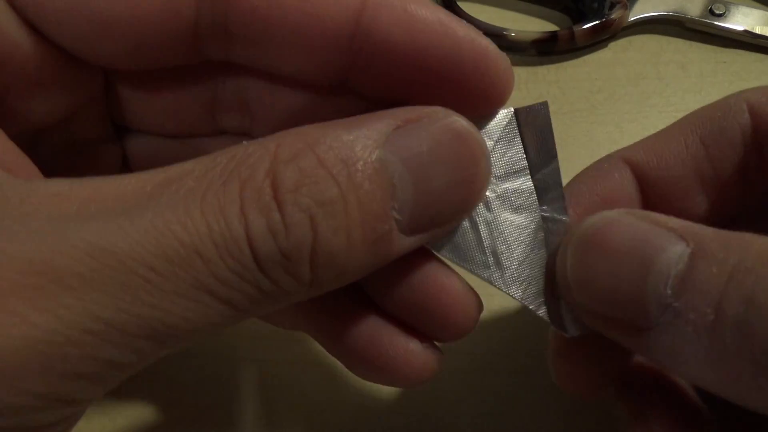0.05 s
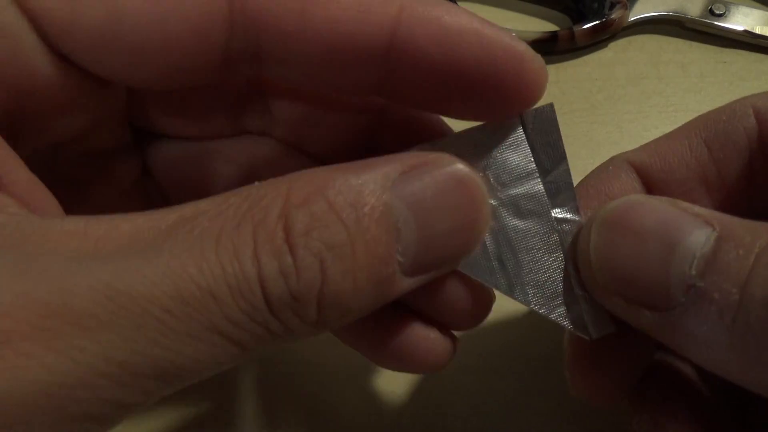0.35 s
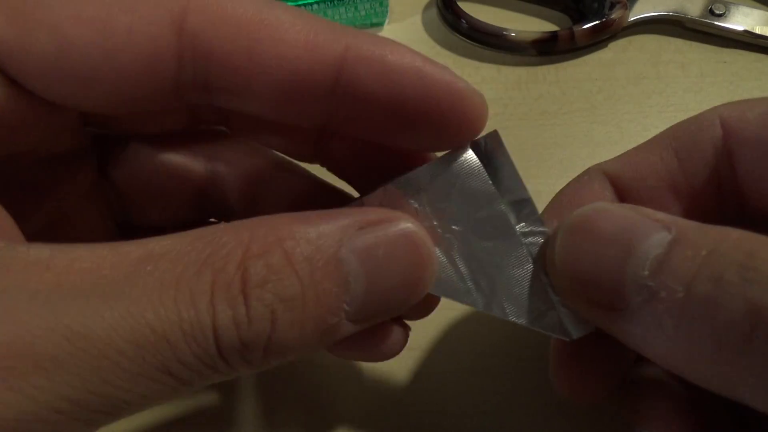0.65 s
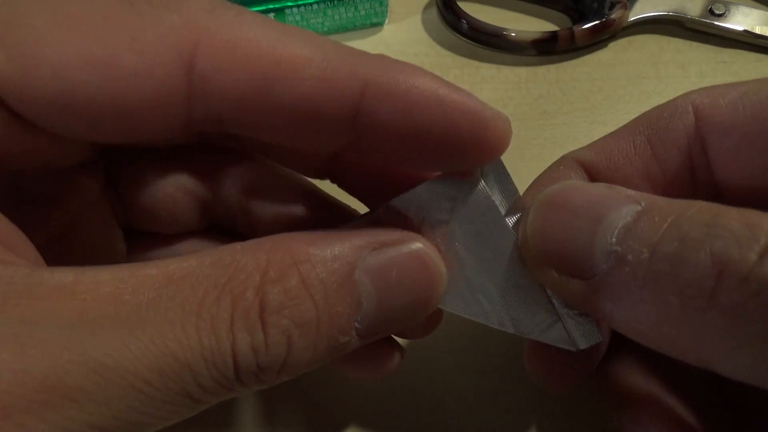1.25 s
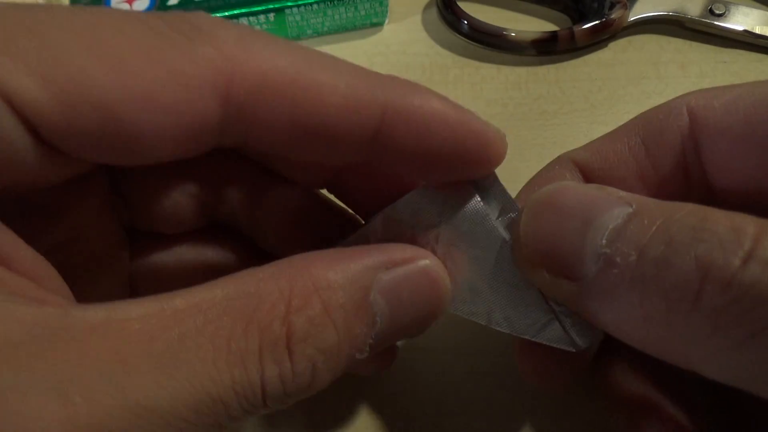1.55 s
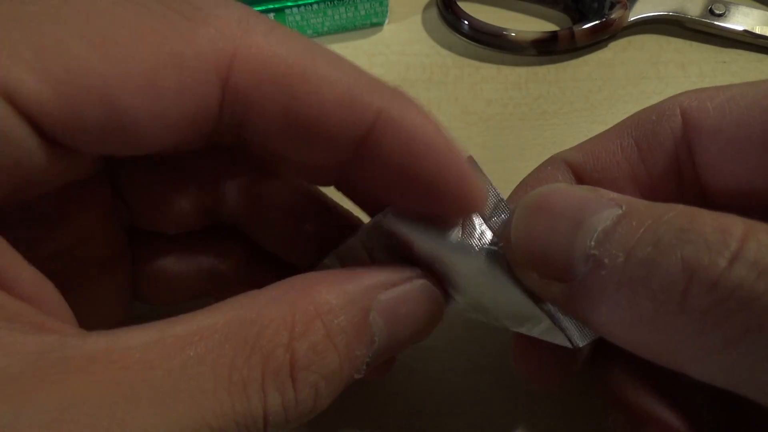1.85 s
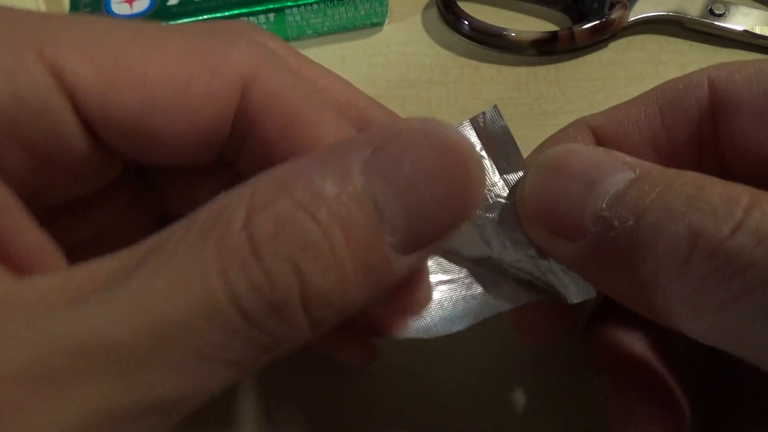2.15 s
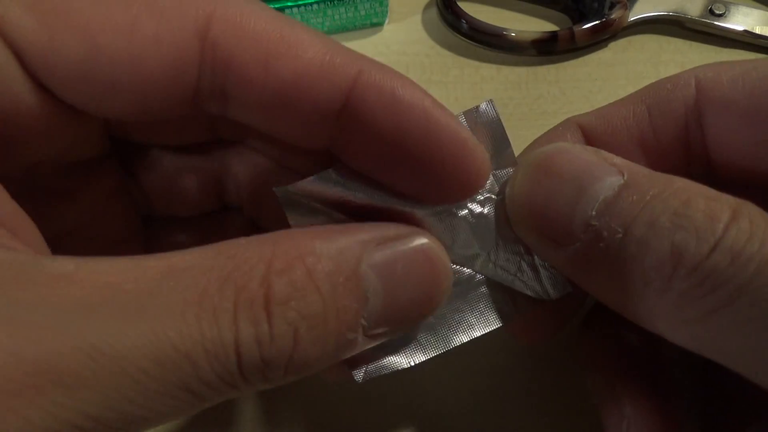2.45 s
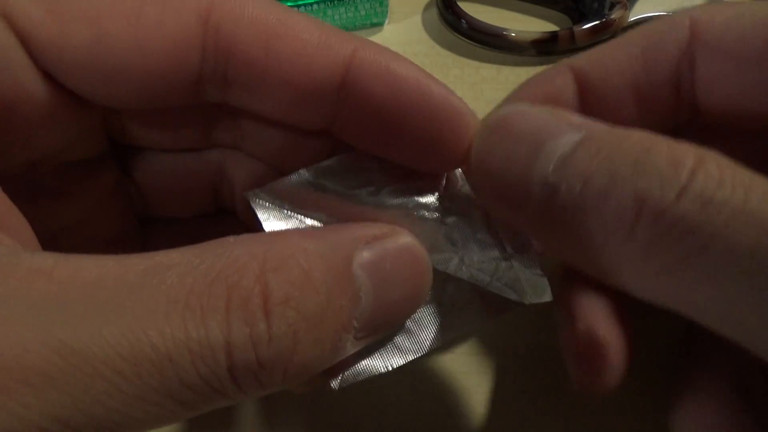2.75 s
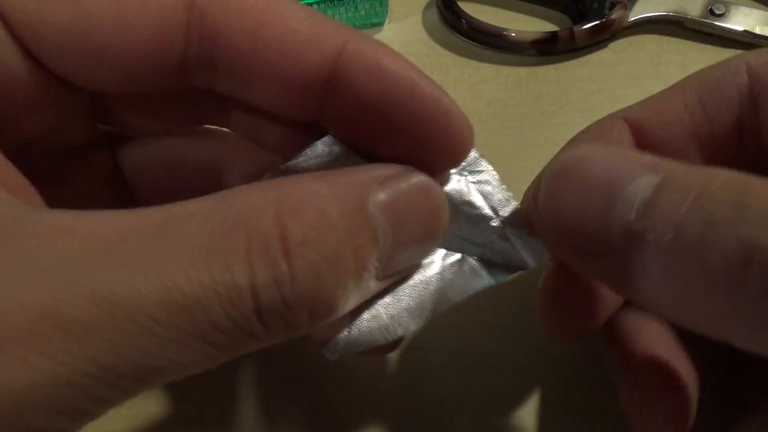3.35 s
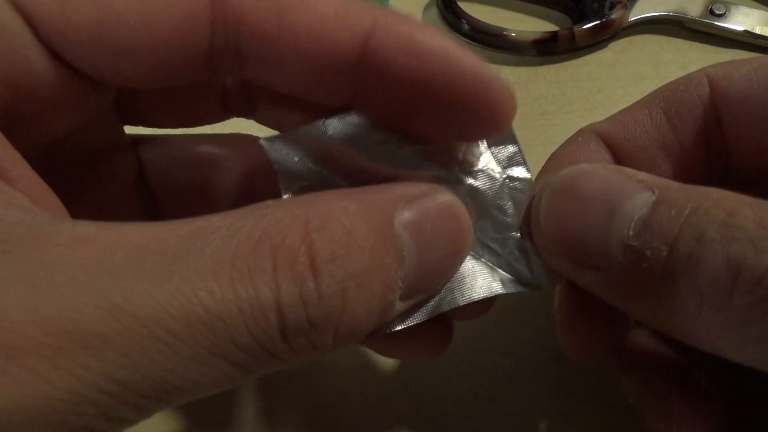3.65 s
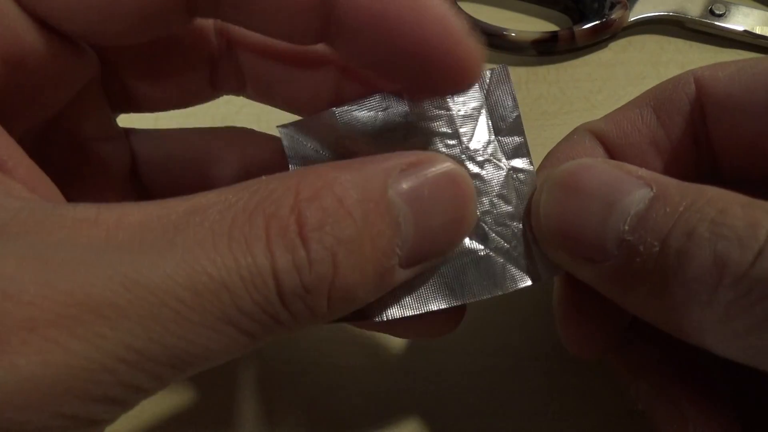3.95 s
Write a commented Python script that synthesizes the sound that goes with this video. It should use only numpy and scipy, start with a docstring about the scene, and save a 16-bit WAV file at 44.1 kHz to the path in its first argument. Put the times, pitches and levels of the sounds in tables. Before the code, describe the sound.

Thin foil paper crinkles as fingers fold it close to the microphone. Scattered tiny snaps come first, then busier crackling with a grainy rubbing hiss and soft fingertip bumps, over a table in a quiet room.

```python
"""Folding thin foil paper

Fingers fold a small sheet close to the microphone, over a table in a quiet room. Bending stores
elastic energy: creases release it in tiny bright snaps, and whole panels buckle with duller pops.
Sliding friction gives a grainy hiss as fingertips smooth the foil, with soft bumps and faint squeaks.
A faint mains hum lies under the room's air."""
import sys
import numpy as np
from scipy import signal
from scipy.fft import rfft, irfft, next_fast_len
from scipy.io import wavfile
from scipy.ndimage import uniform_filter1d, map_coordinates

SR = 44100
rng = np.random.default_rng(int(sys.argv[2]) if len(sys.argv) > 2 else 0)


def to_wav(s):
    """Save 16-bit WAV."""
    ch = np.atleast_2d(s).T  # columns
    pcm = np.round(np.clip(ch, -1, 1) * 32767)  # PCM
    wavfile.write(sys.argv[1], SR, pcm.astype(np.int16))


N = 176400

# creases giving way: peak_s, level_db, length_ms, pitch_hz, crack_over_ring_db
CREASE_SNAPS = [(0.019, -30.5, 0.69, 9100, -4), (0.0245, -26, 1.04, 9500, -1), (.0275, -34, .4, 9100, -2),
                (0.0537, -25, 0.72, 9300, -5), (.0632, -30.5, 0.72, 11400, -5),
                (0.1054, -33, .4, 10700, -6), (.1641, -42.5, .5, 10600, -2), (.2553, -32, 0.65, 11300, 1),
                (.286, -42, .6, 7900, -16), (.3666, -37, .7, 11300, 1), (0.4764, -41, 0.72, 7500, 3),
                (0.7102, -34.5, 2.7, 11200, 4), (0.7123, -34.5, 1.05, 11300, 3), (.763, -38, .43, 11500, 4),
                (0.7863, -38, 1.1, 7700, 3), (0.8063, -28.5, 0.5, 8600, 6), (1.0125, -22, 0.41, 14000, 5),
                (1.082, -42, 1.5, 10800, 5), (1.1223, -40, 0.74, 7560, 11),
                (1.1557, -27.5, 0.29, 8600, -4.5), (1.3012, -38, .45, 9350, 2),
                (1.3343, -36, 1.35, 9200, 3), (1.3413, -34.5, 1.6, 12600, -1),
                (1.4983, -44, 0.56, 9050, -3), (1.659, -25, .45, 8160, 0.5), (1.663, -31.5, 0.82, 6250, 2),
                (1.6624, -26, 0.75, 11600, -11), (1.6672, -31.5, 0.55, 3500, -8),
                (1.714, -22, 0.34, 9800, -4), (1.7225, -34.5, .54, 6350, -2), (1.7773, -31, .46, 8500, -1),
                (1.7815, -27.5, 0.87, 9100, -2), (1.7881, -22, 0.56, 9600, -2), (1.7948, -31, .5, 9050, 0),
                (1.8378, -17.5, 0.24, 10100, -1), (1.8546, -29, 0.73, 11300, -3),
                (1.8616, -22.5, 0.52, 10200, -6), (1.8664, -24.5, .6, 9450, -7),
                (1.869, -20, 0.34, 10200, -12), (1.9203, -24.5, 1.3, 9900, -7.5),
                (1.9238, -15.5, 0.36, 10400, -7), (2.0423, -26.5, .31, 8900, 0),
                (2.0471, -27.5, .42, 14000, -4), (2.051, -27, .43, 14500, -6), (2.1344, -22.5, 1, 10100, 3),
                (2.137, -26, .59, 7100, 6), (2.1365, -29, 0.41, 15500, -2),
                (2.2994, -27.5, 0.98, 10200, -1), (2.6981, -31, .69, 9100, 16),
                (2.746, -18.5, 0.26, 10450, -11), (2.85, -29.5, 0.66, 9800, 3), (2.996, -33, .7, 9000, 11),
                (3.003, -40, .9, 8500, 8), (3.0398, -29.5, .6, 11200, 2), (3.0767, -23, 1, 7300, 1),
                (3.0786, -19.5, 0.77, 10200, 3), (3.0824, -22.5, 1.6, 7850, 1), (3.1053, -35, 1, 8200, 3),
                (3.1346, -32.5, .5, 6200, 2), (3.1775, -33, 0.54, 9600, 0), (3.4013, -39, 0.81, 9600, -1),
                (3.4353, -15.5, 0.63, 8440, -19), (3.4355, -24.5, 0.63, 5530, -21),
                (3.4356, -21, 0.65, 12900, -33), (3.4413, -31, 1.6, 8700, -6), (3.593, -40, 0.72, 3150, -1),
                (3.81, -31, 0.79, 3850, -3), (3.8124, -29.5, 0.65, 10000, -3)]
# panels buckling: time_s, relative_level_db, length_ms, pitch_hz
PANEL_POPS = [(.019, -41.5, 1.5, 1260), (.0252, -37.5, 1.1, 1800), (.054, -40, 1.8, 1730),
              (.5038, -48.5, 2.4, 1560), (.71, -46, 3.4, 1280), (.8059, -40.5, 1.7, 472),
              (1.0135, -41, 2.3, 545), (1.3416, -44, 1.2, 2960), (1.6618, -30.5, 2.5, 3320),
              (1.6632, -42.5, 4.2, 770), (1.664, -34, 1.7, 2250), (1.711, -44.5, 3.5, 3300),
              (1.7788, -42, 1.3, 2100), (1.7883, -45.5, 2.2, 540), (1.8629, -43.5, 2.9, 840),
              (1.8671, -43, 1.9, 1650), (1.9246, -40.5, 3.8, 1090), (2.0105, -47.5, 5.7, 786),
              (2.0199, -47, 2.7, 676), (2.1363, -33.5, 3.2, 1530), (2.137, -50, 3.1, 610),
              (2.271, -47, 6.8, 1630), (2.2996, -37, 1.8, 1630), (2.3039, -29, 1.1, 1790),
              (2.6995, -35, 1.34, 567), (2.8351, -48, 5.5, 1900), (3.0016, -48, 1.9, 750),
              (3.0782, -33, 0.76, 1900), (3.0836, -30, 2.5, 1390), (3.1054, -41, 1.6, 590),
              (3.2334, -45.5, 1.1, 644), (3.436, -27, 1, 1970), (3.4417, -45, 10, 1870),
              (3.4585, -50, 5.4, 543), (3.6116, -42, 1.2, 1440), (3.7104, -45.5, 2.7, 2430),
              (3.8131, -30, 0.71, 1580), (3.8133, -33, 1.9, 630), (3.8535, -46.5, 2.9, 746)]
# fingers sliding: start_s, end_s, relative_level_db, swell_db, body_db, sheen_db
FINGER_STROKES = [(0, 0.06, -48, -3, -2.5, -7), (0.11, 0.12, -62, 17, 3.5, -6),
                  (0.346, 0.399, -53.5, 0, -6, -7), (0.467, 0.53, -60.5, 2, 2, -10),
                  (0.677, 0.707, -64.5, 13.5, 8, -12), (0.784, 0.784, -51, -15, 6.5, -7),
                  (0.806, 0.87, -59.5, -16, -1, -5), (0.897, 0.912, -60.5, 3, -1.5, -8),
                  (1.07, 1.088, -58, 0, -3, -8), (1.334, 1.336, -48, -4, -7, -2),
                  (1.659, 1.698, -48.5, -14, -3, -12), (1.703, 1.713, -36, -13, -24, -10),
                  (1.756, 1.767, -49, -3, 1.5, -11), (1.784, 1.85, -51.5, -6, -2.5, 0),
                  (1.846, 1.887, -46, -14, -8.5, -9), (1.93, 1.958, -42, -1, -6.5, -22),
                  (1.999, 2.022, -39.5, 11, -17.5, -5), (2.023, 2.063, -45, -4, -11.5, -12),
                  (2.105, 2.16, -48, 0, -3.5, -16), (2.19, 2.259, -53, 5.5, -4.5, -6),
                  (2.272, 2.351, -45.5, -5, -8.5, -7), (2.37, 2.492, -49, 7.5, -4.5, -10),
                  (2.524, 2.613, -51, 12, -3.5, -12), (2.64, 2.725, -57, 10.5, -4, -6),
                  (2.751, 2.924, -48.5, -7, -11, -11), (2.832, 2.853, -51.5, -11, 3, -12),
                  (2.938, 2.984, -51.5, 4, -7.5, -15), (2.993, 3.076, -45, -5.5, -2, -5),
                  (3.106, 3.154, -40.5, -6, -9.5, -21), (3.171, 3.217, -48, -7, -3.5, -7),
                  (3.232, 3.345, -53.5, 0, -8.5, -7), (3.403, 3.421, -56, -20, -1.5, -4),
                  (3.46, 3.478, -54.5, 21.5, -3.5, -6), (3.5, 3.503, -46, 8.5, -2, -11),
                  (3.601, 3.679, -54, -12, -2.5, -11), (3.69, 3.724, -50, 7, -5.5, -8),
                  (3.748, 3.827, -49.5, 11.5, -3, -2.5), (3.856, 3.91, -47, -1, -3, -6)]
# the small facet and wider panel ringing under each grip: time_s, facet_hz, facet_over_hiss_db, panel_hz
GRIP_RESONANCES = [(0, 9300, -8, 1780), (.345, 11900, -3, 2720), (.675, 11800, -4, 1680),
                   (.81, 7600, -3, 2400), (1.66, 11500, -5, 3300), (1.705, 9100, -10, 3200),
                   (1.78, 10800, -2, 3170), (1.93, 10600, -3, 3280), (2.0, 9000, -7, 1480),
                   (2.023, 14400, 8, 3360), (2.1, 10200, -1, 3200), (2.275, 10100, -3, 1850),
                   (2.37, 10300, -5.5, 2880), (2.75, 9300, -1, 3260), (2.83, 9150, -8, 1890),
                   (3.105, 9350, -2.5, 4500), (3.235, 9550, 0, 3270), (3.45, 10200, 0, 3080),
                   (3.6, 8000, -10, 3260), (3.75, 7460, -4, 2700), (3.855, 8900, -8, 3420)]
# fingertips landing: start_s, level_db, final_pitch_hz
FINGER_BUMPS = [(1.659, -39.5, 226), (2.135, -34.5, 187), (2.697, -46, 250), (2.999, -42, 179),
                (3.078, -48, 223), (3.106, -39, 154), (3.244, -38.5, 155), (3.608, -40.5, 205)]
# skin squeaking on the foil: start_s, length_s, level_db, pitch_hz
SKIN_SQUEAKS = [(1.111, 0.0064, -55.5, 4170), (1.175, .066, -65.5, 2910)]
# spectra of a snap's crack, the three bands of friction noise and the room's air: frequency_hz, gain_db
CRACK_SPECTRUM = [(30, -58), (200, 0), (700, -7.5), (2000, -6.5), (4500, -3.5), (7000, -2), (10000, -4),
                  (13000, -2.5), (16500, -1)]
HISS_SPECTRUM = [(2500, -21), (4500, -7), (6000, -4.5), (7500, 1.5), (9600, 0), (11500, -2.5), (13500, -13),
                 (16500, -30)]
BODY_SPECTRUM = [(120, -7.5), (300, 1), (700, -2.5), (1200, -3), (1850, 3), (2500, -2.5), (3200, 2),
                 (4300, -1.5), (7000, -10)]
SHEEN_SPECTRUM = [(9000, -45), (12300, 0), (14500, -2), (16500, -9)]
AIR_SPECTRUM = [(20, -43), (35, -19), (48, 1), (60, -4.5), (100, 5), (150, -0.5), (250, 1), (400, -4),
                (700, -10), (1000, -7), (1600, -14.5), (3000, -17.5), (6000, -21), (9500, -21.5),
                (13000, -24.5), (16500, -28)]
# partials of the mains hum: pitch_hz, level_db
HUM_PARTIALS = [(49.5, -89), (100, -61.5), (119.8, -66.5), (200.2, -71.5)]
# reverberation time of the room: frequency_hz, t60_s
ROOM_DECAY = [(200, 1.7), (2000, 1.3), (12000, 1.2)]
# stereo width: frequency_hz, side_over_mid_db
SIDE_SPECTRUM = [(60, -20), (250, -12.5), (1500, -22), (4000, -29), (8000, -16.5), (13000, -29.5)]


def snap(db, ms, hz, crack_db=-3):
    """Impulsive excitation: a crease yields in tiny slips, cracking and ringing the facet beside it."""
    crack = amp(crack_db) * coloured(noise_burst(ms, rise=0.34), CRACK_SPECTRUM)
    ring = double_resonance(noise_burst(ms * 0.95, rise=0.34), hz, q=3)
    # a faint hiss swells just before the snap and fades after it
    soft_noise_skirt = amp(-18) * coloured(noise_burst(ms=4.1, rise=0.38), CRACK_SPECTRUM)
    return with_energy(unit(crack + ring) + soft_noise_skirt, db, ms)


def pop(db, ms, hz, lag_cycles=0.96):
    """Buckling: a panel rings, heavily damped; dispersion of bending waves brings the lows last."""
    ring = resonance(noise_burst(ms / 2, rise=0.27), hz, q=3.3 * np.sqrt(hz / 1800))
    flex = resonance(ring, hz, q=0.56)
    dispersed = filtered(flex, lambda f: np.exp(-2j * np.pi * lag_cycles * (2 * np.sqrt(f / hz) - f / hz)))
    return with_energy(dispersed, db, ms)


def noise_burst(ms, rise, size=4096):
    """A broadband transient: noise grows and decays exponentially, peaking in the middle."""
    t = (np.arange(size) - size // 2) / SR
    time_constant_s = 2 * ms / 1000 * np.where(t < 0, rise, 1 - rise)
    return rng.standard_normal(size) * np.exp(-np.abs(t) / time_constant_s)


def crinkle(ticks_per_s=27):
    """Superposition of transients: snaps, pops and bumps, with faint ticks at random times."""
    out = np.zeros(N)
    for peak_s, db, ms, hz, crack_db in CREASE_SNAPS:
        add_centred(out, peak_s, snap(db, ms, hz, crack_db))
    for time_s, db, ms, hz in PANEL_POPS:
        add_centred(out, time_s - 0.5 / hz, pop(db - 1, ms, hz))  # half a period early
    for start_s, db, hz in FINGER_BUMPS:
        add_centred(out, start_s, bump(db, hz))
    for _ in range(int(ticks_per_s * N / SR)):
        peak_s = rng.uniform(0, N / SR)
        tick = snap(db=-50.5 + 0.5 * rng.uniform(-0.97, 1), ms=0.46, hz=9200 * np.exp(0.26 * rng.normal()))
        add_centred(out, peak_s, tick)
    return out


def rubbing(grain_db=3, uneven_db=2.0, grip_s=0.01, lift_s=0.0091):
    """Sliding friction: skin catches on the embossed foil, hissing and ringing the facet and panel held."""
    t = np.arange(N) / SR
    grain = amp(grain_db * wobble(2500) + uneven_db * wobble(110))
    hiss, body, sheen = [coloured(flexing(grain * rng.standard_normal(N)), spectrum)
                         for spectrum in (HISS_SPECTRUM, BODY_SPECTRUM, SHEEN_SPECTRUM)]
    catches = grain * rng.standard_normal(N)
    out = np.zeros(N)
    for start, end, db, swell_db, body_db, sheen_db in FINGER_STROKES:
        span = (t > start - .03) & (t < end + .1)
        _, facet_hz, facet_db, panel_hz = min(GRIP_RESONANCES, key=lambda row: abs(row[0] - start))
        grip = np.clip((t[span] - start) / grip_s + .5, 0, 1)
        lift = np.exp(-np.maximum(t[span] - end, 0) / lift_s)
        progress = np.clip((t[span] - start) / (end - start), 0, 1)
        envelope = grip * lift * amp(db + swell_db * (progress - .5))
        panel = amp(-8) * double_resonance(catches[span], panel_hz, q=3.4)
        facet = amp(facet_db) * double_resonance(catches[span], facet_hz, q=5.7)
        out[span] += envelope * (amp(-2) * unit(hiss[span] + facet)
                                 + amp(body_db - .5) * unit(body[span] + panel)
                                 + amp(sheen_db - 1) * sheen[span])
    return out


def flexing(x, depth_db=2.0):
    """Resonances come and go as the sheet bends: a random gain, smooth in frequency and time."""
    spectrogram = signal.stft(x, nperseg=256)[2]
    ripple = rng.standard_normal(spectrogram.shape)
    for _ in range(2):
        ripple = uniform_filter1d(uniform_filter1d(ripple, size=3, axis=0), size=24, axis=1)
    return signal.istft(spectrogram * amp(depth_db * unit(ripple)), nperseg=256)[1][:N]


def bump(db, hz, attack_s=0.0023, t60_s=0.055, sag=0.86, sag_s=0.0045):
    """Soft impact: a fingertip lands with a damped thud whose pitch sinks as the pad flattens."""
    t = np.maximum(np.arange(-SR // 10, SR // 10) / SR, 0)  # contact begins in the middle
    cycles = hz * (t + sag * sag_s * (1 - np.exp(-t / sag_s)))
    envelope = amp(db - 60 * t / t60_s) * (1 - np.exp(-t / attack_s))
    return envelope * np.sin(2 * np.pi * cycles)


def squeaks(waver=0.0268):
    """Stick-slip oscillation: skin grips and lets go fast enough to give a faint, wavering pitch."""
    t, out = np.arange(N) / SR, np.zeros(N)
    for start_s, length_s, db, hz in SKIN_SQUEAKS:
        progress = np.clip((t - start_s) / length_s, 0, 1)
        swell = np.sqrt(np.abs(np.sin(np.pi * progress)))
        cycles = np.cumsum(hz * (1 + waver * wobble(500))) / SR
        out += amp(db) * swell * unit(np.sin(2 * np.pi * cycles))
    return out


def reflections(x, early_db=-19, early_s=0.0034, tail_db=-23.5):
    """Reverberation: early reflections from hands and table, then a faint diffuse tail from the walls."""
    hz, t, spectrogram = signal.stft(rng.standard_normal(SR // 3), SR, nperseg=256)
    decay = amp(-60 * t / along(ROOM_DECAY, hz)[:, None])
    tail = signal.istft(spectrogram * decay, SR, nperseg=256)[1]
    age = np.arange(len(tail)) / SR
    early = rng.standard_normal(len(tail)) * age * np.exp(-age / early_s)
    response = amp(tail_db) * tail / np.linalg.norm(tail) + amp(early_db) * early / np.linalg.norm(early)
    return signal.fftconvolve(x, response)[:N]


def background(air_db=-58.5, drift_rad=0.17):
    """The noise floor: broadband room air and mains hum whose partials drift slightly in phase."""
    t = np.arange(N) / SR
    hum = sum(amp(db) * np.sqrt(2) * np.sin(2 * np.pi * hz * t + drift_rad * wobble(4.5))
              for hz, db in HUM_PARTIALS)
    return hum + amp(air_db) * coloured(rng.standard_normal(N), AIR_SPECTRUM)


def amp(db):
    """Amplitude ratio of a level in decibels."""
    return 10 ** (np.asarray(db) / 20)


def unit(x):
    """Normalisation to rms 1."""
    return x / np.sqrt(np.mean(x ** 2) + 1e-20)


def with_energy(x, db, ms):
    """Energy is power times duration: x takes the energy of level db held for ms."""
    return amp(db) * unit(x) * np.sqrt(ms / 1000 * SR / len(x))


def along(points, hz):
    """Interpolation of (frequency_hz, value) points on a logarithmic frequency axis."""
    frequencies, values = np.transpose(points)
    return np.interp(np.log(hz + 1), np.log(frequencies + 1), values)


def filtered(x, response):
    """Linear filtering: the spectrum of x is multiplied by a frequency response."""
    n = x.shape[-1]
    padded = next_fast_len(n + n // 4)
    return irfft(rfft(x, padded) * response(np.fft.rfftfreq(padded, 1 / SR)), padded)[..., :n]


def coloured(x, spectrum):
    """Spectral shaping by (frequency_hz, gain_db) points, at rms 1."""
    return unit(filtered(x, lambda f: amp(along(spectrum, f))))


def resonance(x, hz, q):
    """Forced response of one damped mode of the sheet, at rms 1."""
    return unit(filtered(x, lambda f: 1j * f * hz / q / (hz * hz - f * f + 1j * f * hz / q)))


def double_resonance(x, hz, q):
    """Two equal resonators in cascade give a peak with steeper sides."""
    return resonance(resonance(x, hz, q), hz, q)


def wobble(rate):
    """Random modulation: a smooth curve through rate random values a second."""
    return map_coordinates(rng.standard_normal(int(N * rate / SR) + 4), [np.arange(N) * rate / SR])


def add_centred(track, time_s, sound):
    """Superposition of a short sound on the track, its middle at time_s."""
    start = round(time_s * SR) - len(sound) // 2
    first, last = max(start, 0), min(start + len(sound), N)
    track[first:last] += sound[first - start:last - start]


def scene():
    """Mid-side stereo: the foil is straight ahead of two close microphone ports, so the image is narrow."""
    foil = rubbing() + crinkle() + squeaks()
    mid = foil + reflections(foil) + background()
    scatter = rng.standard_normal(SR // 200)
    decorrelated = signal.fftconvolve(mid, scatter / np.linalg.norm(scatter))[:N]
    side = filtered(decorrelated, lambda f: amp(along(SIDE_SPECTRUM, f)))
    return np.array([mid + side, mid - side])


def record(dry):
    """Band limiting: a steep low-pass filter removes the highest treble."""
    cutoff_hz = 16500
    return filtered(dry, lambda f: 1 / np.sqrt(1 + (f / cutoff_hz) ** 120))


dry = scene()
out = record(dry)
to_wav(out)
```